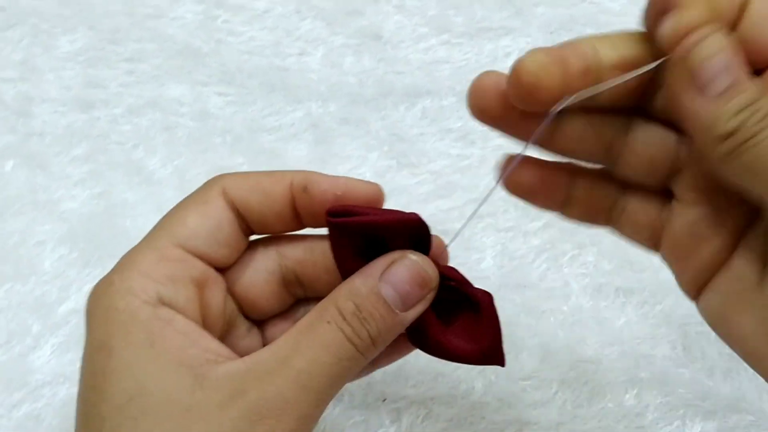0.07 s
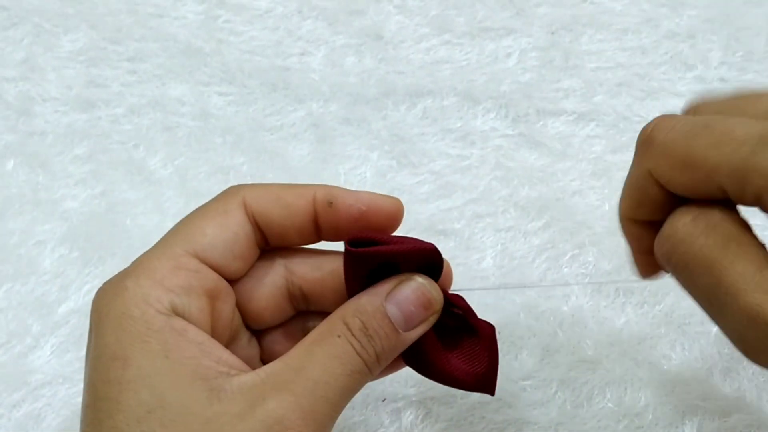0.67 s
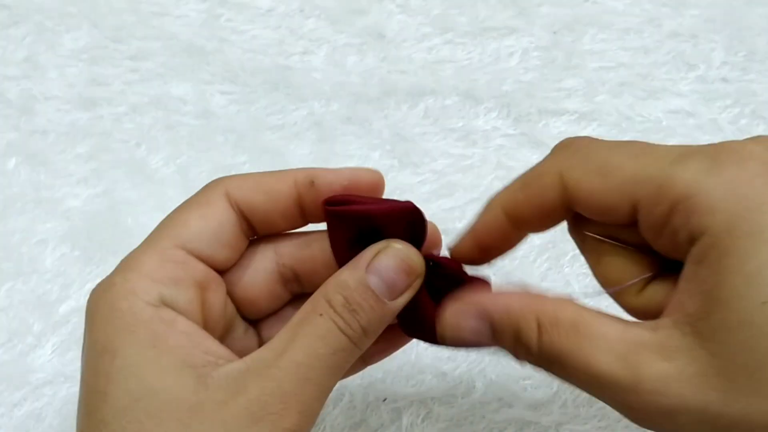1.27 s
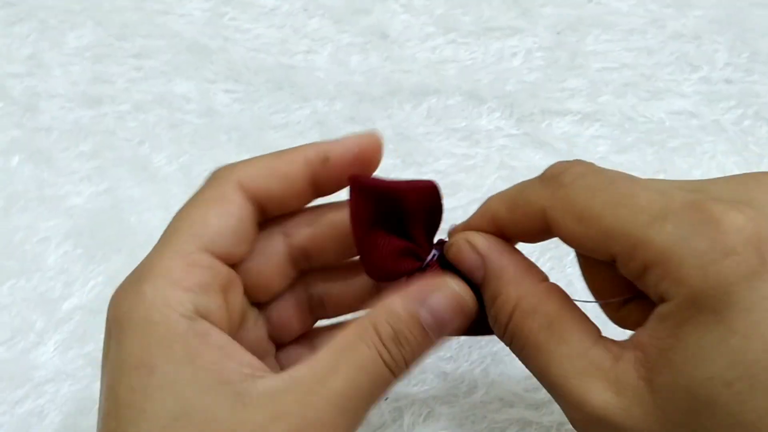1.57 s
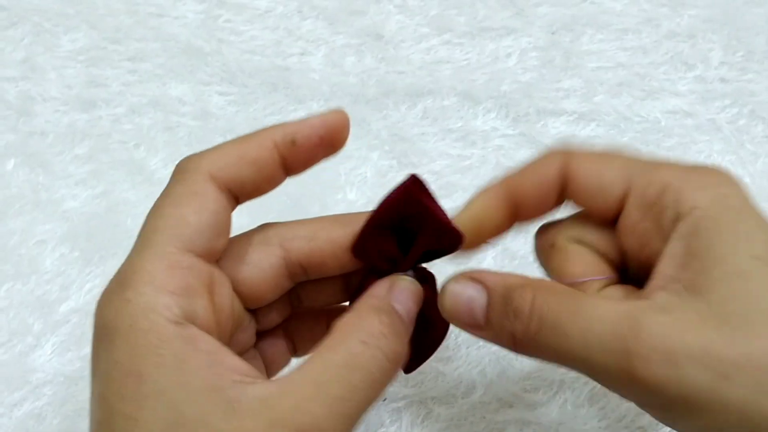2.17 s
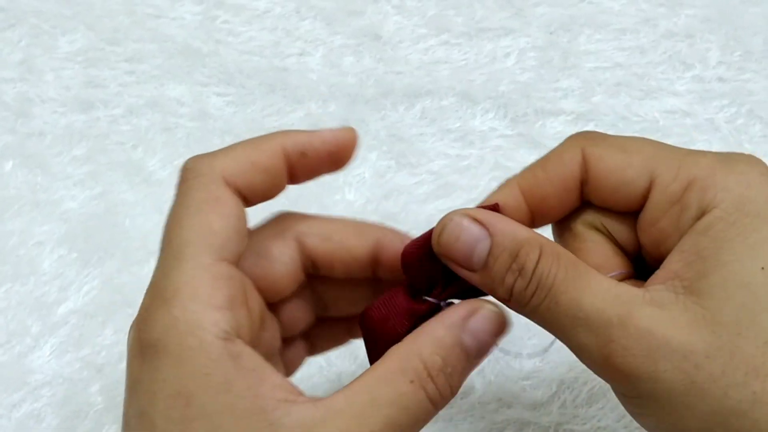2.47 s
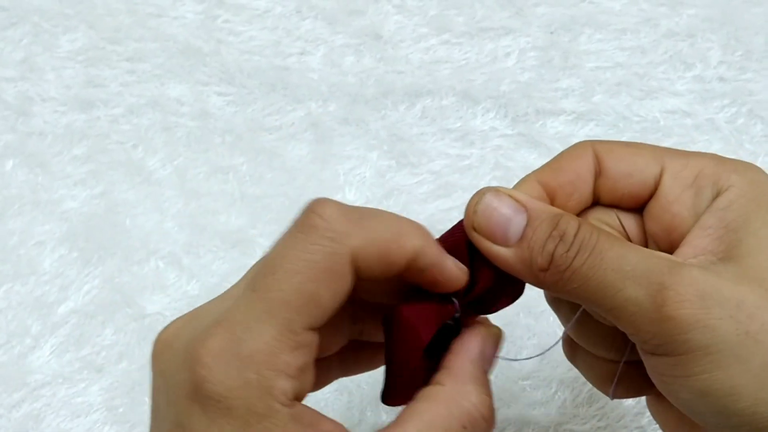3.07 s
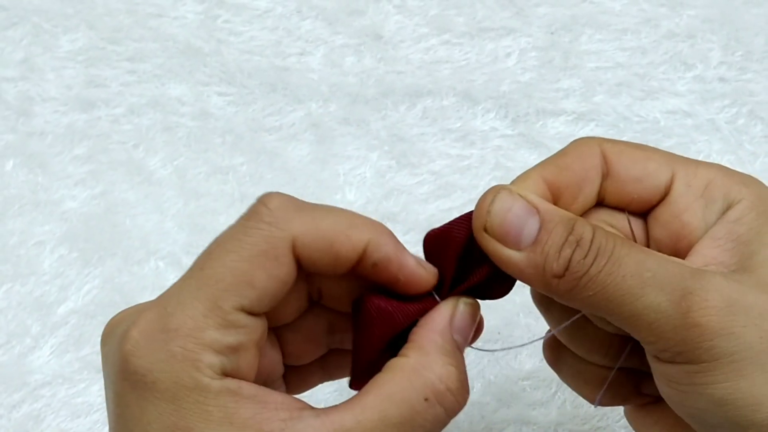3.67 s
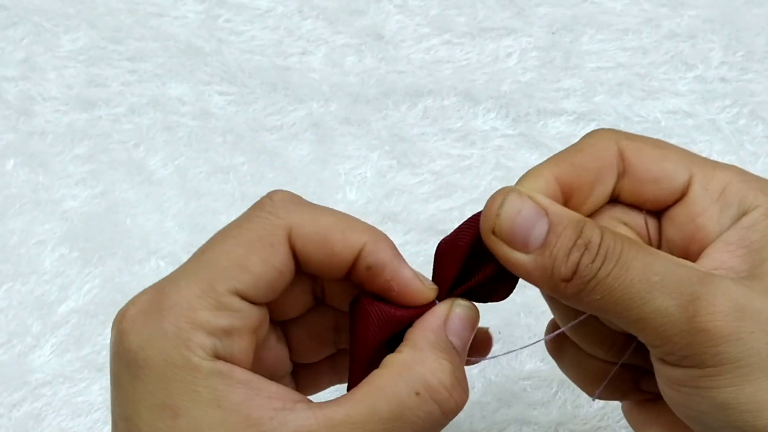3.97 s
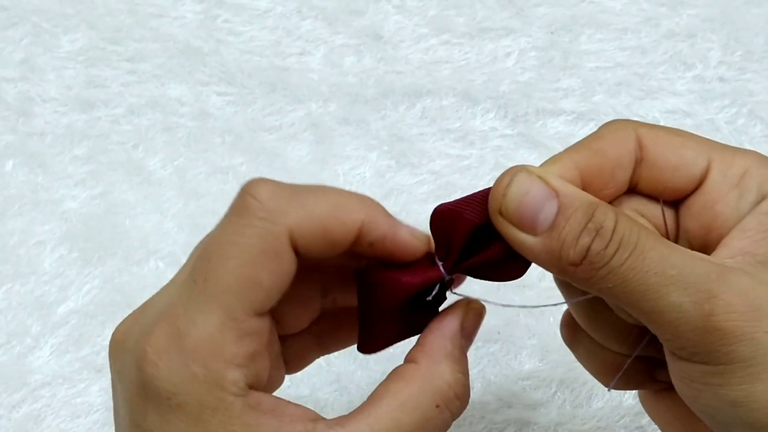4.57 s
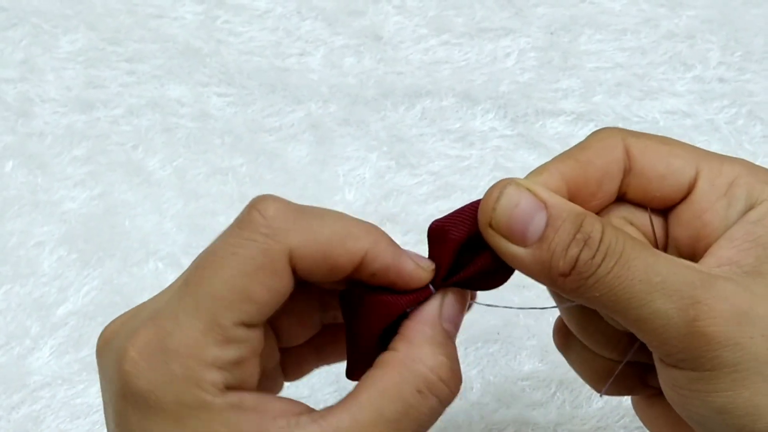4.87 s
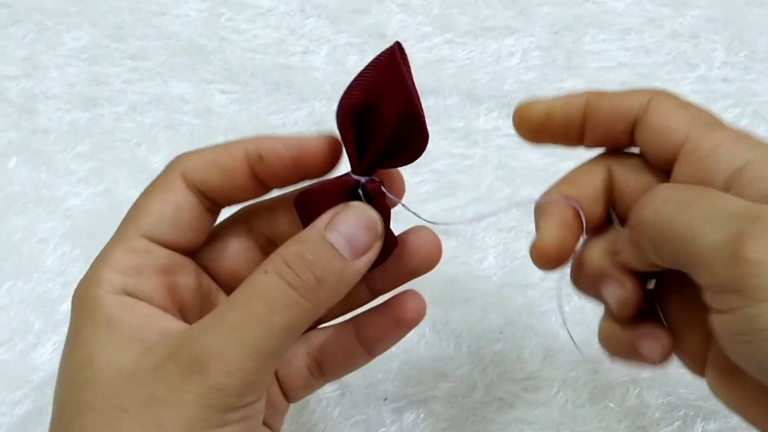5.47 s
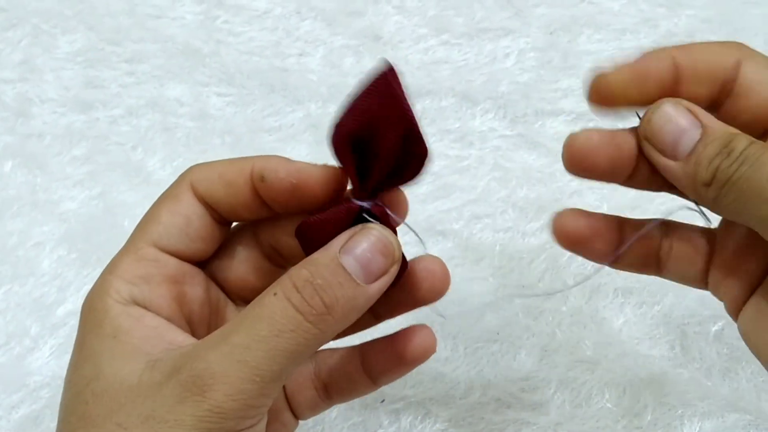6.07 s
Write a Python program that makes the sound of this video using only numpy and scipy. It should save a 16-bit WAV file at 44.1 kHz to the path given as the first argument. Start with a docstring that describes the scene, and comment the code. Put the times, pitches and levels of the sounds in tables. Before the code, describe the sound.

A low traffic rumble and the wavering hum of distant motors come through the walls of a quiet room. Close by, thread slides faintly over ribbon in short, dry slips and ticks as it is wrapped by hand. One cushioned knock on the table comes near the start, then a brief rasp of tightening thread, later a small sharp needle click and a cluster of soft ticks.

```python
"""Sewing thread is wound by hand round a gathered ribbon, close to a phone on a cloth-covered table.
Fibre catches on fibre as the thread slides, slips in short rasps and ticks over the folds.
Something bumps the table once, a hand brushes the cloth and the needle clicks on a fingernail.
Behind it, two motors outside drone through the walls of the quiet room over a low traffic rumble."""
import sys
import numpy as np
from scipy import signal
from scipy.fft import rfft, irfft, next_fast_len
from scipy.io import wavfile
from scipy.ndimage import map_coordinates

SR = 44100
rng = np.random.default_rng(int(sys.argv[2]) if len(sys.argv) > 2 else 0)


def wav_out(sig):
    """Save sig, one row per channel (or a flat mono array), as 16-bit PCM at SR to the path in sys.argv[1]."""
    wavfile.write(sys.argv[1], SR, np.round(np.clip(np.atleast_2d(sig).T, -1, 1) * 32767).astype(np.int16))


N = 278094
T = np.arange(N) / SR
FFT_SIZE = next_fast_len(N)
FREQS = np.fft.rfftfreq(FFT_SIZE, 1 / SR) + 1e-3


def undb(db):
    """Decibels to gain."""
    return 10 ** (np.asarray(db) / 20)


def unit(x):
    """Scale to rms 1."""
    return x / np.sqrt(np.mean(x ** 2))


def over_time(points):
    """Join breakpoints by straight lines in time."""
    return np.interp(T, *np.transpose(points))


def over_freq(points):
    """Join breakpoints by straight lines over log frequency."""
    hz, value = np.transpose(points)
    return np.interp(np.log(FREQS), np.log(hz), value)


def eq(x, gain):
    """Filter by a gain per frequency."""
    return irfft(rfft(x, FFT_SIZE) * gain, FFT_SIZE)[..., :N]


def drift(hz):
    """Slow random modulation with rms 1."""
    return unit(eq(rng.standard_normal(N), np.exp(-(FREQS / hz) ** 2)))


def bandpass(x, hz, q):
    """Two-pole resonance."""
    return signal.lfilter(*signal.iirpeak(min(hz, SR / 3), q, fs=SR), x)


def cushion(x, hz):
    """A soft contact takes the edge off a blow."""
    return signal.sosfilt(signal.butter(3, hz, fs=SR, output="sos"), x)


def add(track, s, sound):
    """Mix a sound in at s seconds."""
    start = int(s * SR)
    track[start:start + len(sound)] += sound[:N - start]


def strike(s, modes):
    """One blow rings a set of decaying modes."""
    out, t = np.zeros(N), T[:SR // 3]
    add(out, s, sum(undb(db - 60 * t / t60) * np.sin(2 * np.pi * hz * t) for hz, db, t60 in modes))
    return out


def fibres(per_s, spread_db):
    """Friction grain: dense tiny catches of fibre on fibre, uneven in size."""
    catches = (rng.random(N) < per_s / SR) * rng.standard_normal(N)
    return unit(catches * undb(spread_db * np.minimum(rng.exponential(size=N), 4)))


def ports(x, lag_ms, right_db):
    """Sound reaches the right microphone port first and a little louder."""
    late = map_coordinates(x, [np.arange(N) - lag_ms * SR / 1000], order=3, mode="nearest")
    return np.array([late * undb(-right_db / 2), x * undb(right_db / 2)])


def room(x, t60, wet_db):
    """A short diffuse tail, different at each port."""
    t = T[:SR // 2]
    tail = rng.standard_normal((2, len(t))) * undb(-60 * t / t60) * (t > .002)
    tail /= np.sqrt(np.sum(tail ** 2, axis=1, keepdims=True))
    return undb(wet_db) * signal.fftconvolve(x[None], tail, axes=1)[:, :N]


# Tone of the rumble and hiss. Each row: frequency in Hz, relative level in dB.
BED_EQ = [(20, 1.5), (35, -7), (60, -8.5), (90, -13.5), (160, -17), (250, -20.5), (400, -25.5),
          (650, -31.5), (1000, -42.5), (1700, -56), (3000, -56.5), (7500, -62.5), (10000, -64),
          (15500, -64.5)]
# How alike the bed is at the two ports. Each row: frequency in Hz, likeness from 0 (wide) to 1 (mono).
BED_LIKENESS = [(25, 0.51), (60, .85), (130, 0.9), (290, 0.6), (640, 0.3), (1400, 0), (6000, 0.18),
                (10000, 1)]


def background(level_db=-51, swell_db=.7):
    """A bed of slowly swelling traffic rumble, with smooth microphone hiss on top."""
    tone, likeness = undb(over_freq(BED_EQ)), np.clip(over_freq(BED_LIKENESS), 0, 1)
    mid = eq(rng.standard_normal(N), tone * np.sqrt(1 + likeness))
    side = eq(rng.standard_normal(N), tone * np.sqrt(1 - likeness))
    bed = np.array([mid + side, mid - side]) * undb(level_db) / np.std(mid)
    # the right port picks up more of the bass
    right_db = over_freq([(25, 12.5), (70, 5.5), (250, 2.3), (1000, 3.6), (4000, .3)])
    bed = eq(bed, undb(np.array([-right_db, right_db]) / 2))
    traffic = eq(bed, over_freq([(120, 0), (260, 1), (1200, 1), (2500, 0)]))
    return bed + traffic * (undb(swell_db * drift(1.1)) - 1)


# Level rides of the upper and the lower motor. Each row: time in seconds, level in dB.
UPPER_RIDE = [(0.0, -60), (0.56, -52), (0.88, -59), (1.9, -46), (2.68, -56), (2.72, -51), (4.02, -69),
              (4.25, -50), (4.93, -51), (5.16, -74), (5.4, -57), (5.44, -63), (6.3, -51.5)]
LOWER_RIDE = [(0.0, -66), (0.09, -58.5), (0.75, -53), (1.07, -61.5), (1.19, -53), (2.21, -54.5), (2.3, -68),
              (2.53, -50), (2.79, -48), (3.91, -69.5), (3.96, -51.5), (4.53, -58.5), (4.86, -72.5),
              (5.76, -54), (5.89, -62.5), (6.3, -57.5)]
# Overtones of the upper motor. Each row: harmonic number, dB against the fundamental at full load.
UPPER_OVERTONES = [(2, -29), (3, -21.5)]
# Boom of the room. Each row: centre in Hz, width in Hz, offset in dB, dB gained per dB of upper motor.
ROOM_MODES = [(225.75, 12, -21, 0.76), (203.4, 18, -2, 1.18)]


def motors(unloaded_hz=132.53, sag_hz=4, lower_hz=107):
    """Two distant motors beat against each other and stir the low resonances of the room."""
    upper_db, lower_db = over_time(UPPER_RIDE) + .02, over_time(LOWER_RIDE) - .1
    # as the upper motor works harder its pitch sags and its overtones come up
    load = undb(.46 * (upper_db - upper_db.max()))
    upper_pitch = (unloaded_hz - sag_hz * load) * (1 + .008 * drift(9))
    phase = 2 * np.pi * np.cumsum(upper_pitch) / SR
    upper = unit(np.sin(phase) + load * sum(undb(db) * np.sin(k * phase) for k, db in UPPER_OVERTONES))
    lower_pitch = lower_hz * (1 + .007 * drift(7.8))
    lower = unit(np.sin(2 * np.pi * np.cumsum(lower_pitch) / SR))
    drone = upper * undb(upper_db + 1.3 * drift(11)) + lower * undb(lower_db + 1.3 * drift(12))
    for hz, width, db, follow in ROOM_MODES:
        resonance = 1 / (1 + (2 * (FREQS - hz) / width) ** 2)
        drone += unit(eq(rng.standard_normal(N), resonance)) * undb(db + follow * upper_db)
    return ports(drone, lag_ms=.17, right_db=3.5)


# Ring of the table top. Each row: pitch in Hz, level in dB, seconds to fall 60 dB.
TABLE_MODES = [(236, -35, 0.12), (151, -42, 0.059), (303, -40, 0.038), (525, -50, 0.023), (920, -46, 0.018),
               (1450, -70, .008), (2640, -56, 0.0087), (3420, -76, 0.01)]


def table_bump():
    """One dull, cushioned knock rings the table top."""
    return cushion(strike(s=1.2174, modes=TABLE_MODES), hz=4200)


# Ring of the needle on a fingernail. Each row: pitch in Hz, level in dB, seconds to fall 60 dB.
NEEDLE_MODES = [(420, -48, 0.024), (735, -49, 0.014), (1020, -45, .011), (1320, -49, 0.011),
                (1900, -56, .01), (2570, -52, 0.0088), (3860, -50, 0.0054), (7050, -47.5, 0.0042),
                (7150, -50, 0.0052)]
# The landing and the rebound. Each row: start in seconds, gain in dB.
NEEDLE_CONTACTS = [(3.3258, 2.5), (3.3269, -11)]


def needle_click():
    """The needle lands and rebounds more softly, so fast that it makes one sharp click."""
    return cushion(sum(undb(db) * strike(s, NEEDLE_MODES) for s, db in NEEDLE_CONTACTS), hz=8900)


# The hand brushes the table cloth after the bump. Each row: time in seconds, level in dB.
BRUSH_RIDE = [(1.2, -110), (1.225, -73), (1.33, -75.5), (1.47, -80), (1.62, -100)]
# A fingertip scuffs the ribbon. Each row: centre in seconds, level in dB.
FINGER_SCUFFS = [(.632, -72), (5.11, -80.5), (5.208, -74.5), (5.33, -79)]
# Tone of skin on fabric. Each row: frequency in Hz, relative level in dB.
CLOTH_EQ = [(400, -10), (1000, 6.5), (1700, -7.5), (2800, -10.5), (4000, -17), (5200, -15.5), (8000, -35)]


def cloth_brush(half_scuff_s=.011):
    """Skin drags over fabric: a fine grain that rises with the pressure."""
    scuffs = sum(undb(db) * np.exp(-((T - s) / half_scuff_s) ** 2) for s, db in FINGER_SCUFFS)
    pressure = undb(over_time(BRUSH_RIDE)) + scuffs
    grain = eq(fibres(per_s=14000, spread_db=-1.5), undb(over_freq(CLOTH_EQ)))
    return unit(grain) * pressure


def handling():
    """Bump, click and brush sit close by, to the right, with a touch of room."""
    sound = table_bump() + needle_click() + cloth_brush()
    return ports(sound, lag_ms=.045, right_db=4.5) + room(sound, t60=.11, wet_db=-12.5)


# Thread snapping over a fold. Each row: start in seconds, level in dB, brightest frequency in Hz.
FOLD_TICKS = [(.732, -70, 5200), (1.88, -65, 7300), (1.947, -68, 7030), (2.152, -68, 6000),
              (2.806, -69.5, 3900), (3.007, -64, 5460), (3.303, -70, 7000), (4.590, -63.5, 5500),
              (4.606, -61, 5030), (4.657, -69.5, 6100), (4.72, -68, 5070), (4.949, -66.5, 5640)]


def ticks(slide_db, rise_s=.0012, faint_count=30, faint_hz=5870, spread_octaves=.3):
    """Taut thread flicks over a fold in a tiny burst; faint extra ticks fall at random."""
    out, t = np.zeros(N), T[:SR // 50]
    envelope = (t / rise_s * np.exp(1 - t / rise_s)) ** 2
    faint = [(T[i], slide_db[i] + 6.5, faint_hz * 2 ** rng.normal(0, spread_octaves))
             for i in rng.integers(0, N, faint_count)]
    for s, db, hz in faint + FOLD_TICKS:
        noise = rng.standard_normal(len(t))
        flick = unit(bandpass(noise, hz, q=2.8) + .12 * noise)
        add(out, s, undb(db) * flick * envelope)
    return out


# Thread slipping through the folds.
# Each row: start in seconds, length in seconds, level in dB, brightest frequency in Hz.
FOLD_SLIPS = [(0.626, 0.012, -67.5, 5800), (0.718, 0.0044, -67, 6000), (1.343, 0.013, -70.5, 6000),
              (2.049, 0.0081, -65, 5600), (2.967, .034, -70, 6400), (3.318, .012, -65, 6400),
              (3.568, .008, -68.5, 5200), (4.321, 0.0087, -58, 3700), (4.375, .01, -71, 5500),
              (4.614, .011, -63.5, 5300), (4.983, 0.0048, -61.5, 6500), (5.202, 0.012, -70.5, 4830)]


def slips(attack_s=.0023, release_s=.003):
    """Each slip is a rasp of fibres that starts quickly and stops when the thread grips again."""
    out, t = np.zeros(N), T[:SR // 8]
    grain = fibres(per_s=10000, spread_db=2)
    attack = 1 - np.exp(-(t / attack_s) ** 2)

    def slip(s, length, db, hz, swell_db):
        catches = grain[int(s * SR):][:len(t)]
        rasp = unit(bandpass(catches, hz, q=1.8) + .64 * catches)
        release = np.exp(-np.maximum(t - length - attack_s / 2, 0) / release_s)
        level = undb(db + swell_db * np.minimum(t / length, 1))
        add(out, s - attack_s / 2, rasp * attack * release * level)

    for row in FOLD_SLIPS:
        slip(*row, swell_db=-3)  # short slips slow down
    slip(s=1.489, length=.05, db=-68, hz=5600, swell_db=15)  # the loop gathers speed as it draws tight
    return out


# Fingers shift their grip. Each row: centre in seconds, half length in seconds, level in dB.
GRIP_SHIFTS = [(.3, .07, -84), (.82, 0.032, -84), (2.08, 0.056, -82), (2.33, 0.038, -82.5),
               (2.5, 0.063, -83), (2.98, .13, -82.5), (4.36, .03, -83), (4.77, .04, -82), (5.34, .04, -87)]


def sliding_level(hold_db=-93.5, creep_db=-16, half_creep_s=.037):
    """Friction in dB: the held ribbon is never still, the grip shifts, thread creeps round each slip."""
    creeps = [(s + length / 2, half_creep_s, db + creep_db) for s, length, db, _ in FOLD_SLIPS]
    swells = sum(undb(db) ** 2 * np.exp(-((T - s) / half) ** 2) for s, half, db in GRIP_SHIFTS + creeps)
    return 10 * np.log10(undb(hold_db) ** 2 + swells)


def long_pull(end_s=.86, fade_s=.08, level_db=-91.5):
    """Thread runs freely through the ribbon with a thin, smooth hiss."""
    envelope = np.clip((end_s - T) / fade_s, 0, 1) * undb(level_db + 3.2 * drift(9))
    return unit(bandpass(rng.standard_normal(N), hz=7300, q=4)) * envelope


# Tone of thread rubbing on ribbon. Each row: frequency in Hz, gain in dB.
THREAD_EQ = [(500, -6.5), (1000, -6.5), (1600, -7), (2100, 2), (2700, 4), (3300, 0.5), (3900, 5), (5200, 0),
             (6300, -2), (7500, 0.5), (8600, -10.5), (10500, -16), (15500, -18.5)]


def thread():
    """Thread rubs on ribbon: sliding, slips and ticks share one tone, with the long pull on top."""
    slide_db = sliding_level()
    flutter_db = 2.2 * drift(25)
    slide = fibres(per_s=3200, spread_db=4) * undb(slide_db + flutter_db)
    friction = undb(3) * slide + undb(2.5) * (slips() + ticks(slide_db))
    sound = eq(friction, undb(over_freq(THREAD_EQ))) + long_pull()
    # the hands move about, so the lag between the ports wanders
    direct = ports(sound, lag_ms=.1 + .035 * drift(14), right_db=2.2)
    # the fingers scatter the sound at once, the room a little later
    return direct + room(sound, t60=.01, wet_db=-7) + room(sound, t60=.15, wet_db=-21)


def scene():
    """Close handwork in front of the drone and the rumble."""
    return thread() + handling() + motors() + background()


def record(dry, top_hz=15700):
    """The phone cuts the top treble steeply."""
    return signal.sosfiltfilt(signal.ellip(10, .1, 50, top_hz, fs=SR, output="sos"), dry)


dry = scene()
out = record(dry)
wav_out(out)
```